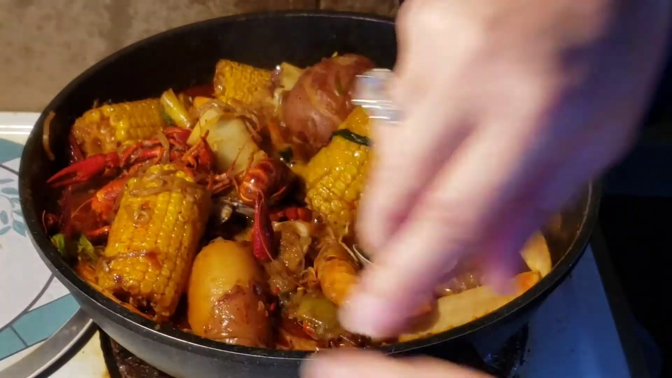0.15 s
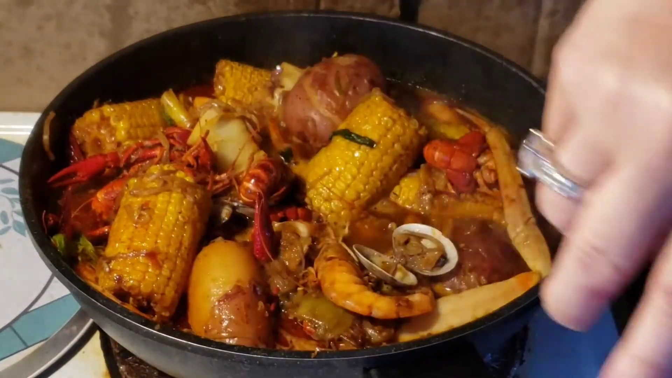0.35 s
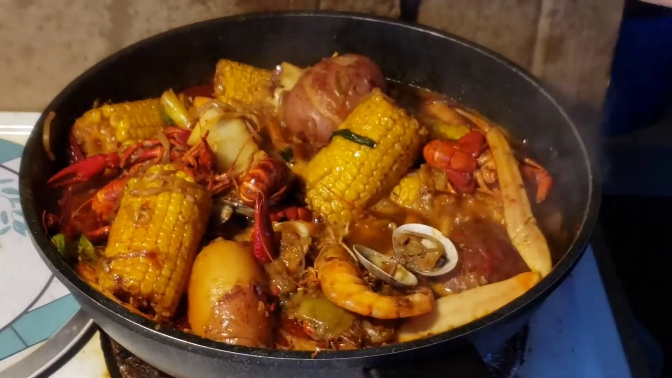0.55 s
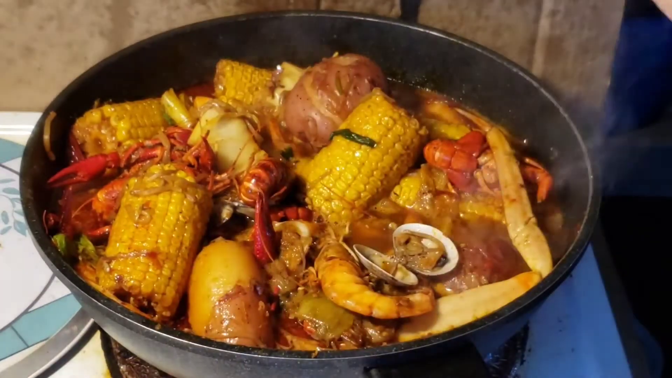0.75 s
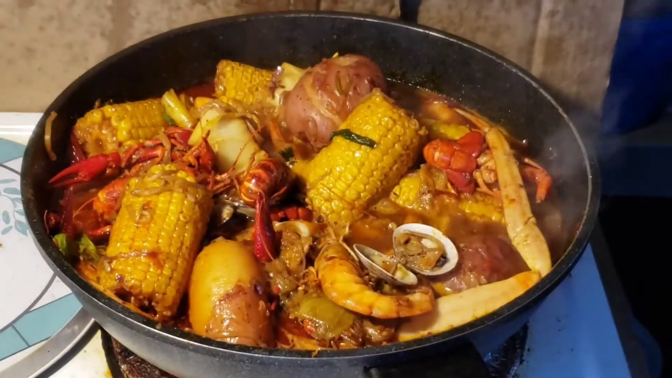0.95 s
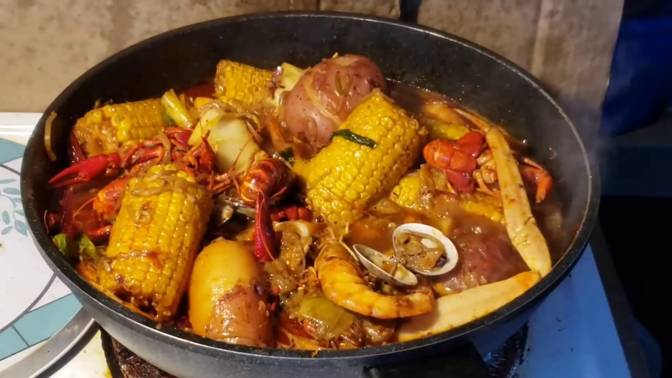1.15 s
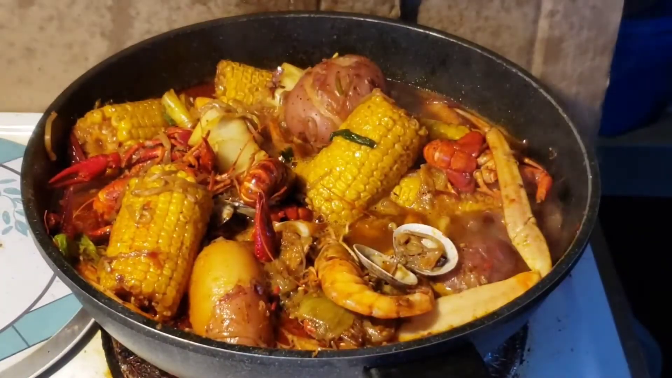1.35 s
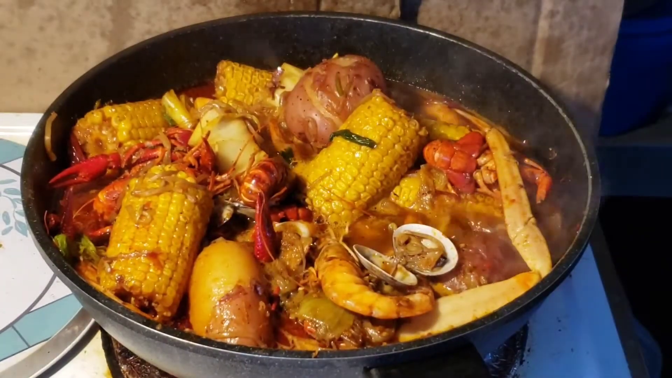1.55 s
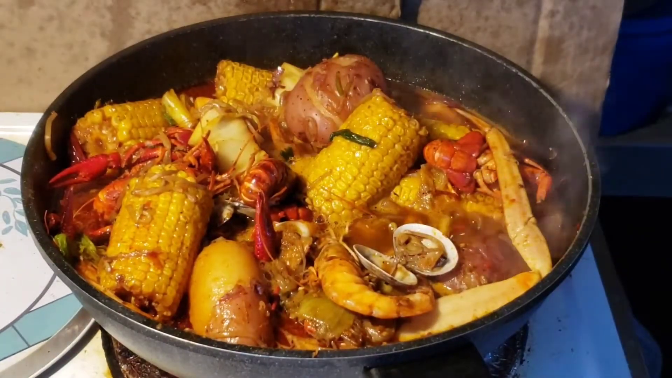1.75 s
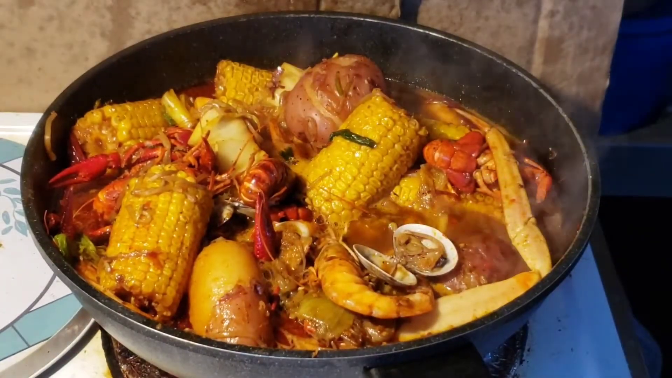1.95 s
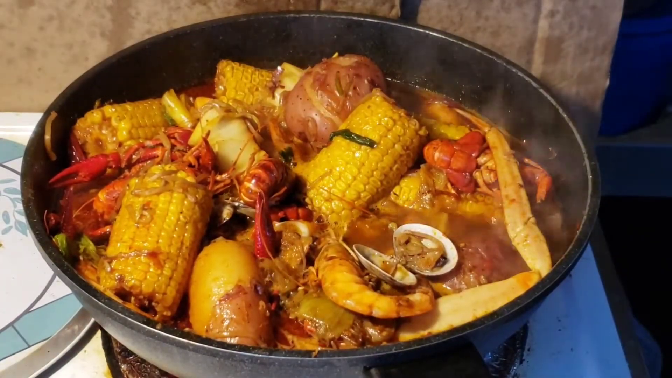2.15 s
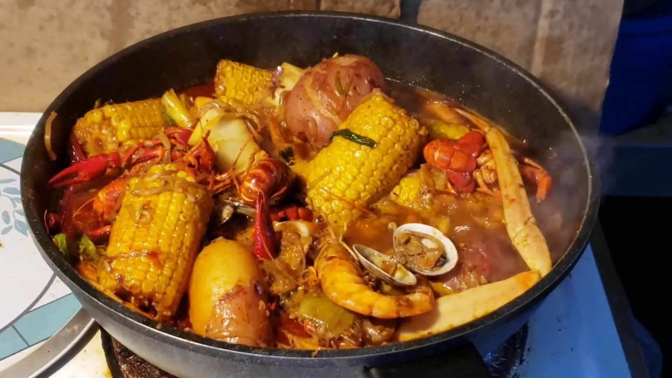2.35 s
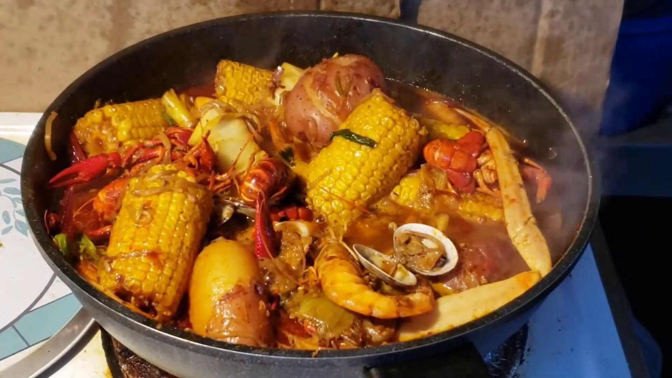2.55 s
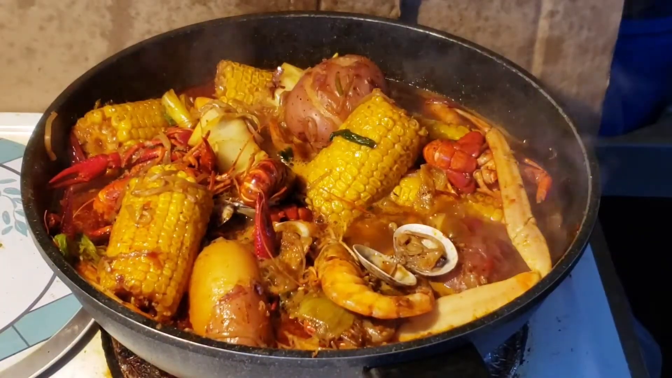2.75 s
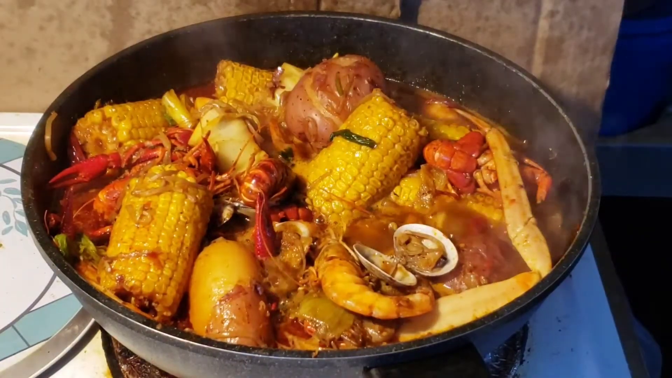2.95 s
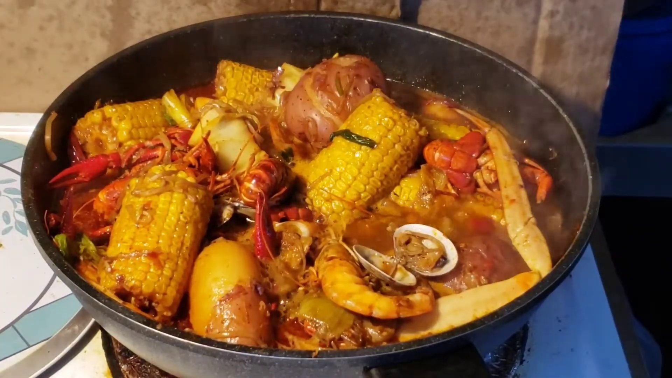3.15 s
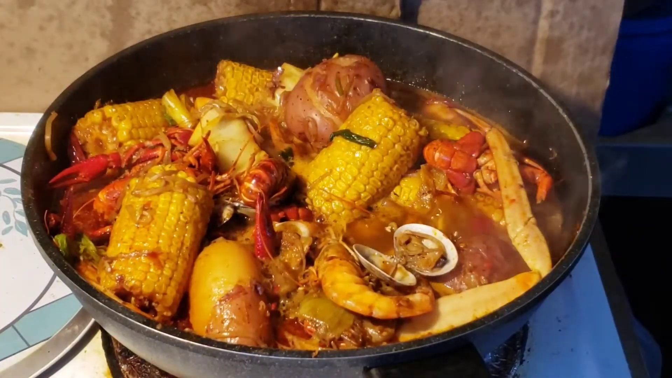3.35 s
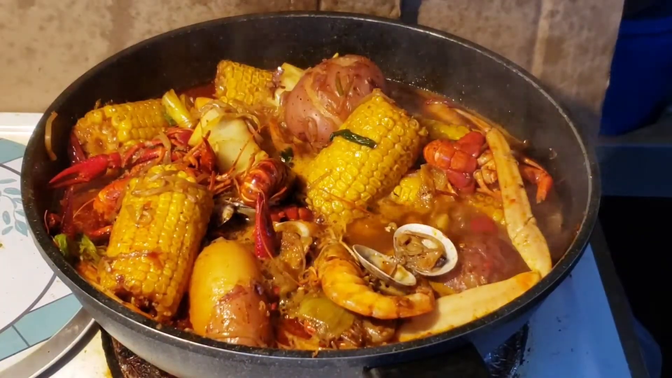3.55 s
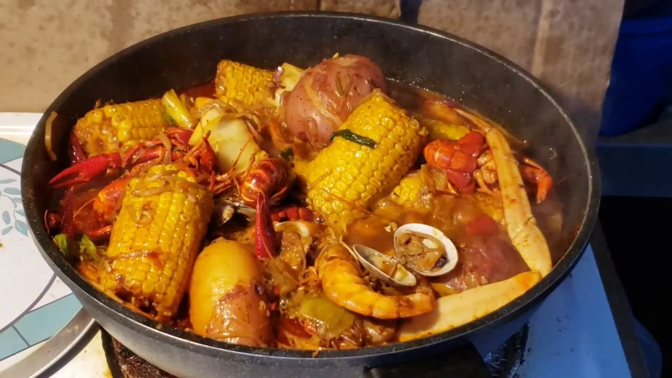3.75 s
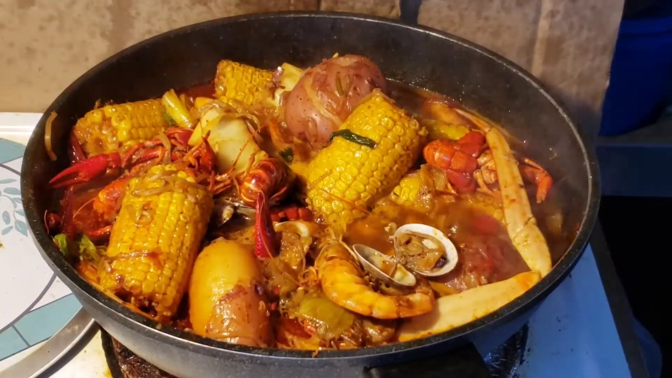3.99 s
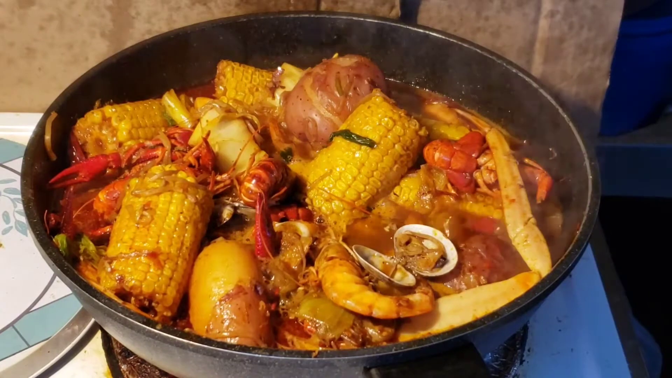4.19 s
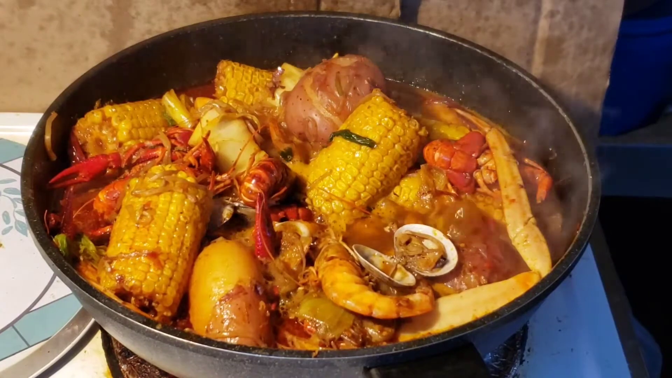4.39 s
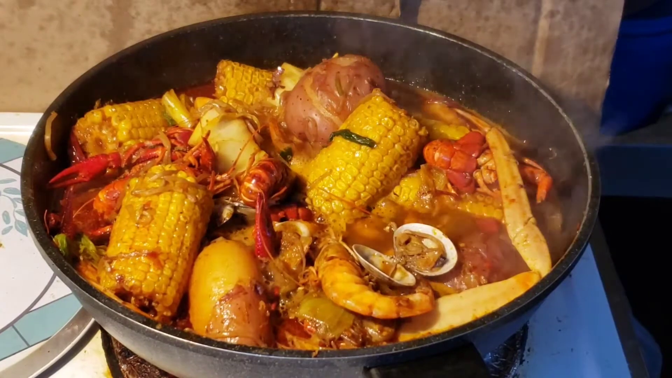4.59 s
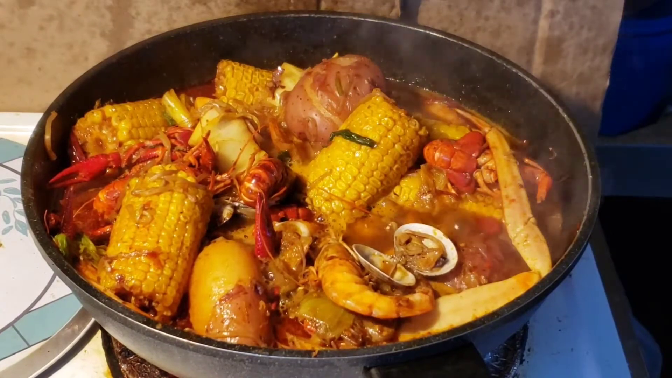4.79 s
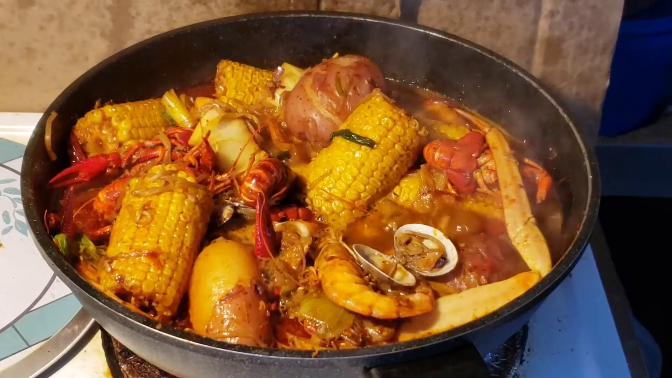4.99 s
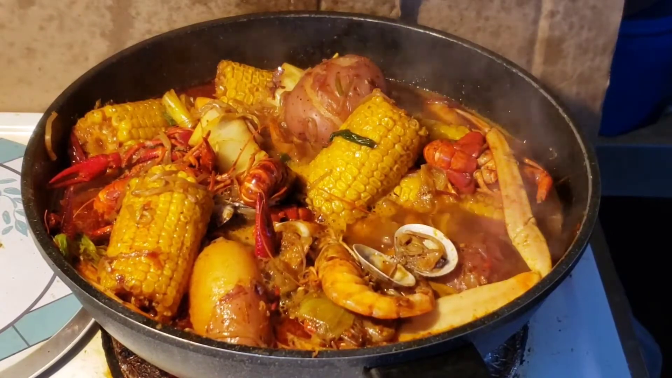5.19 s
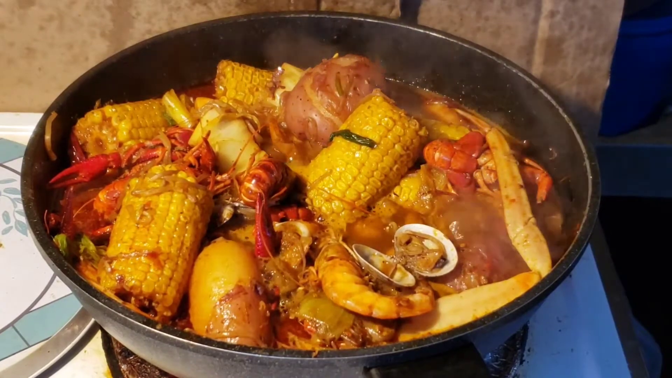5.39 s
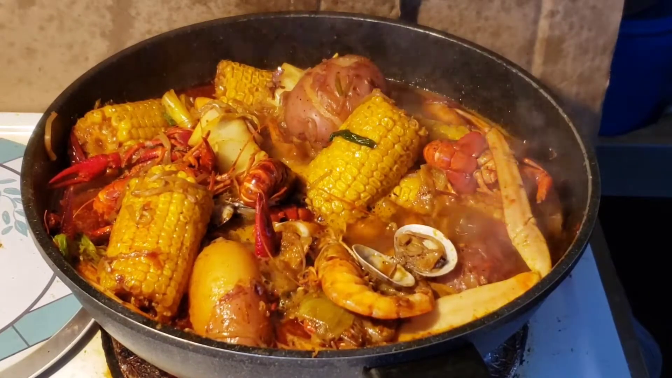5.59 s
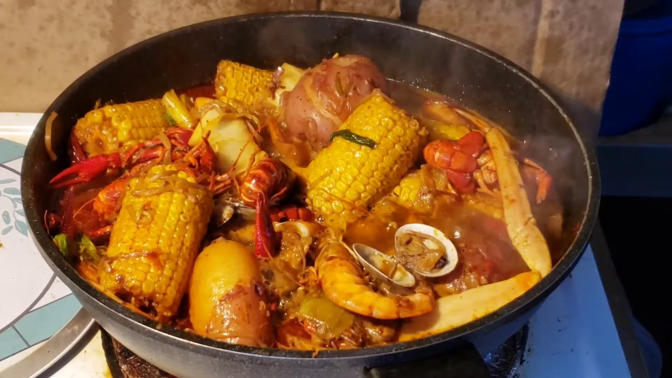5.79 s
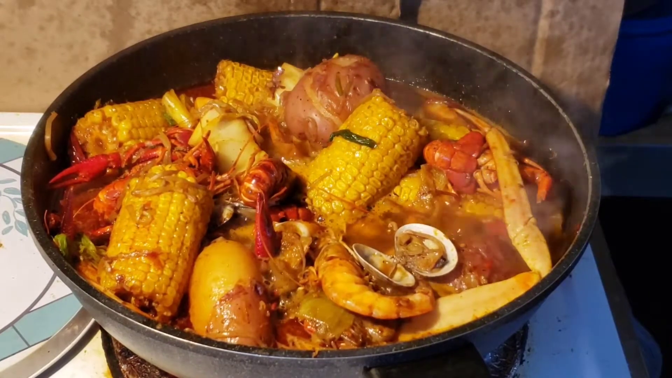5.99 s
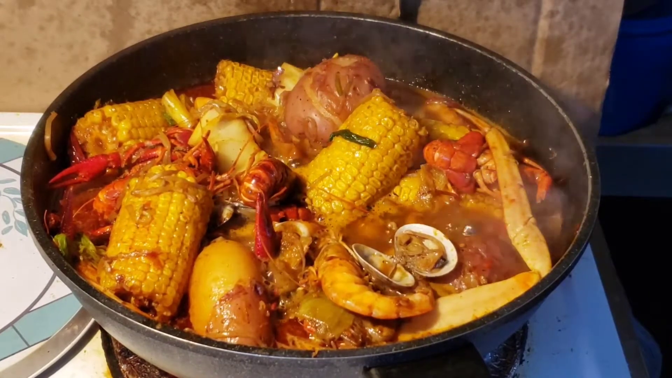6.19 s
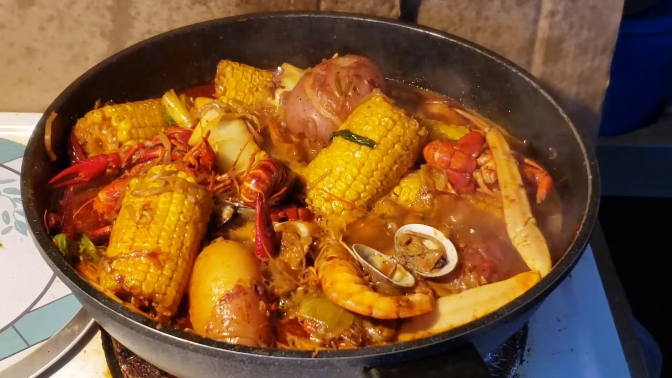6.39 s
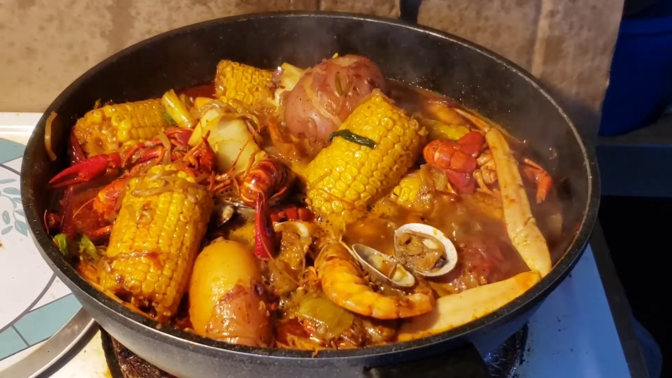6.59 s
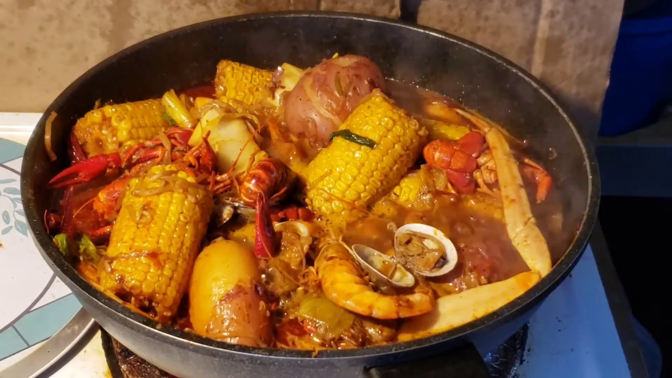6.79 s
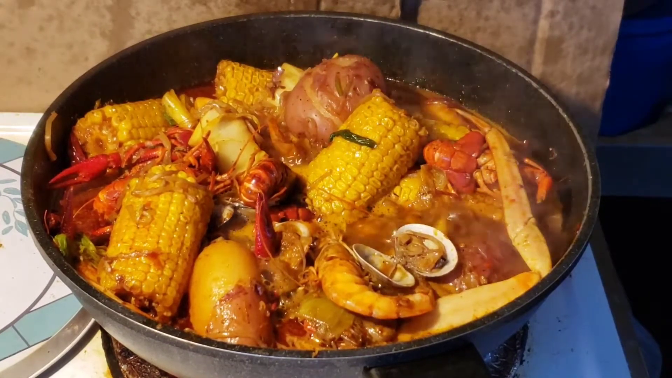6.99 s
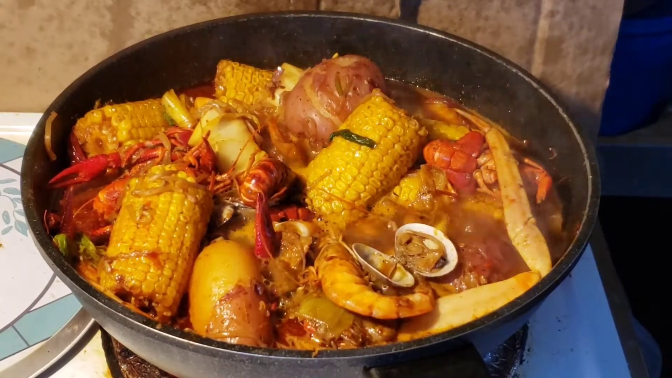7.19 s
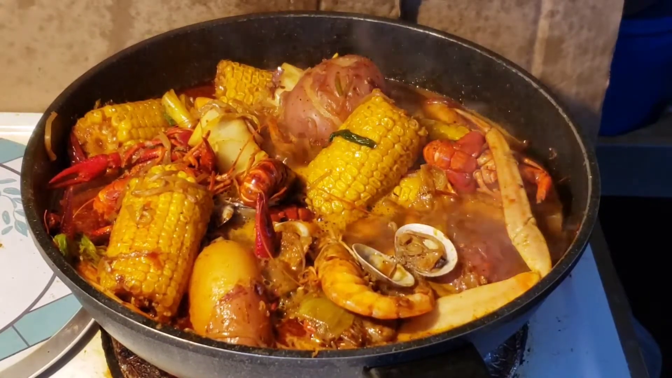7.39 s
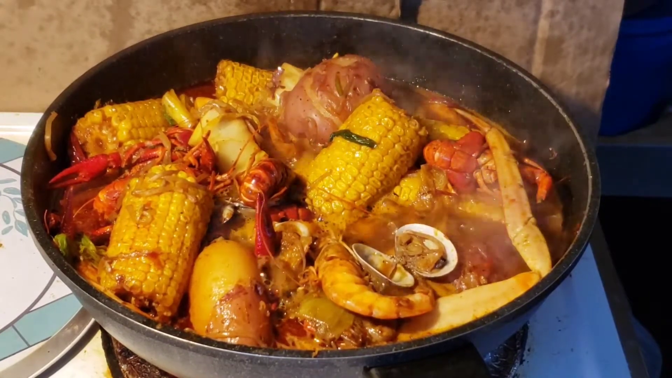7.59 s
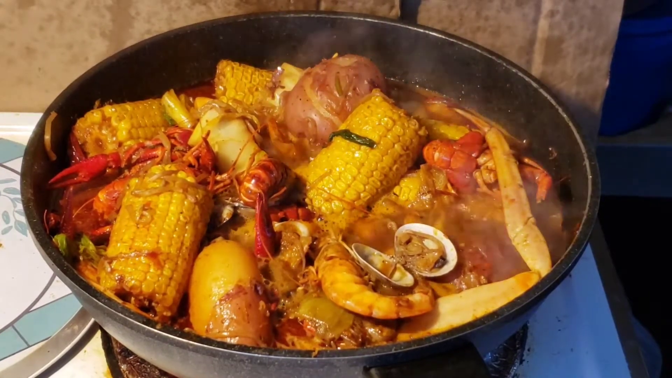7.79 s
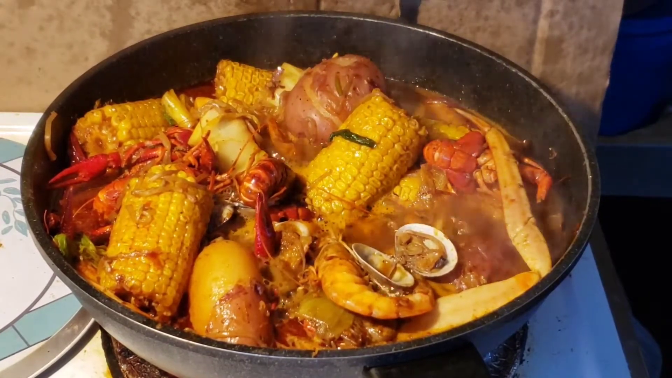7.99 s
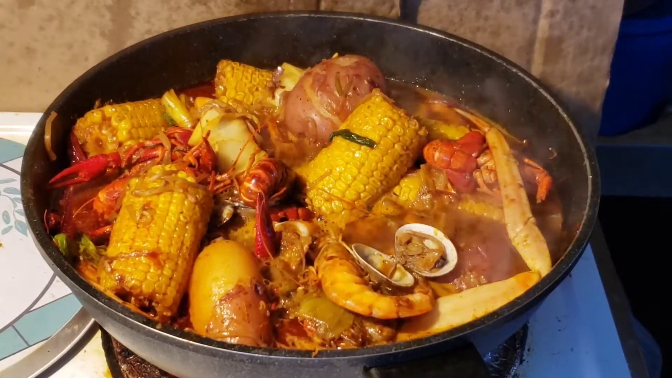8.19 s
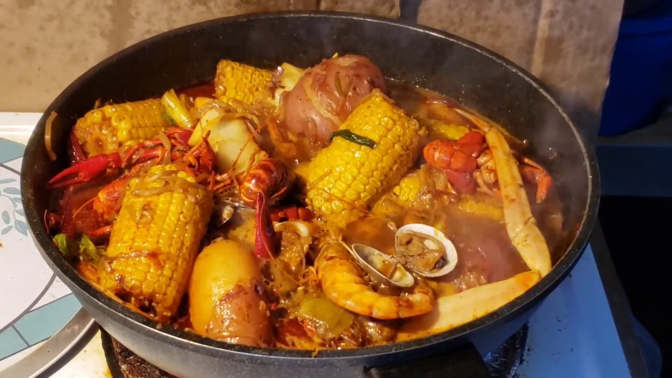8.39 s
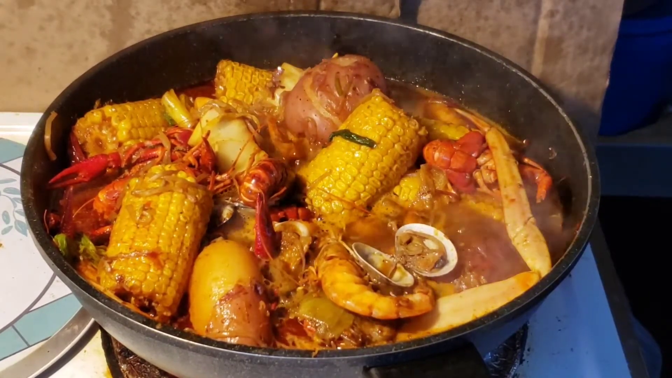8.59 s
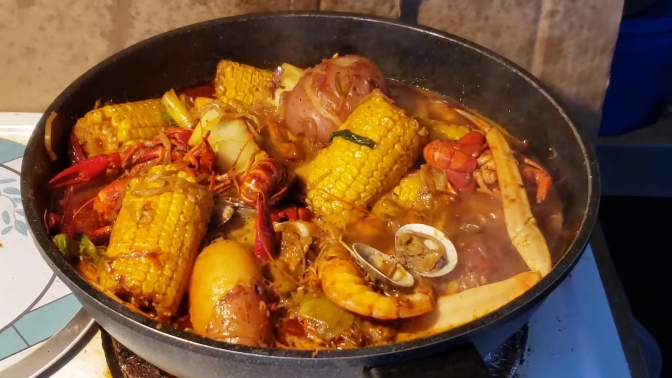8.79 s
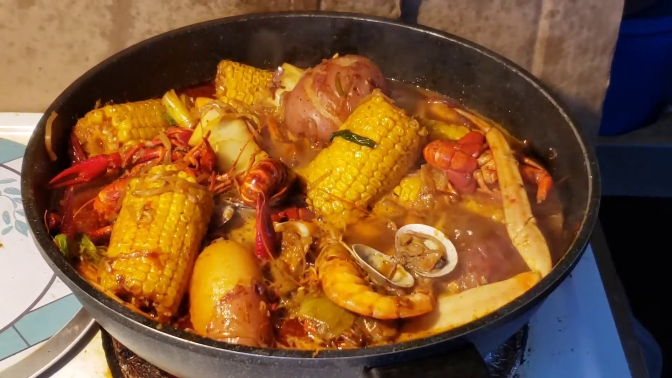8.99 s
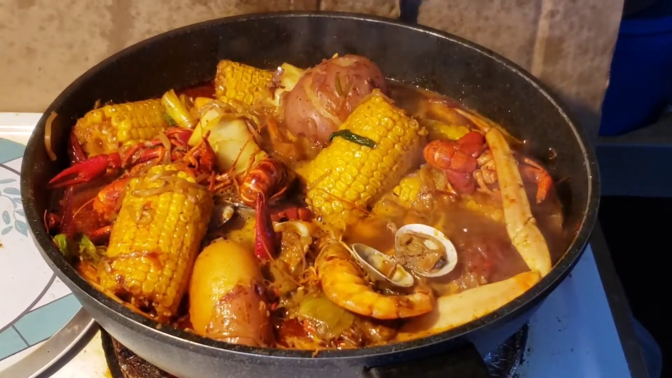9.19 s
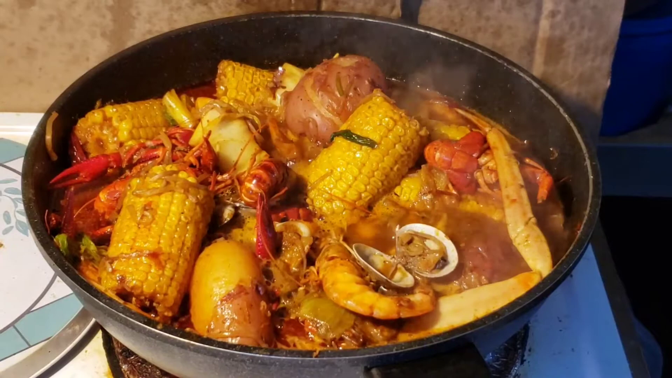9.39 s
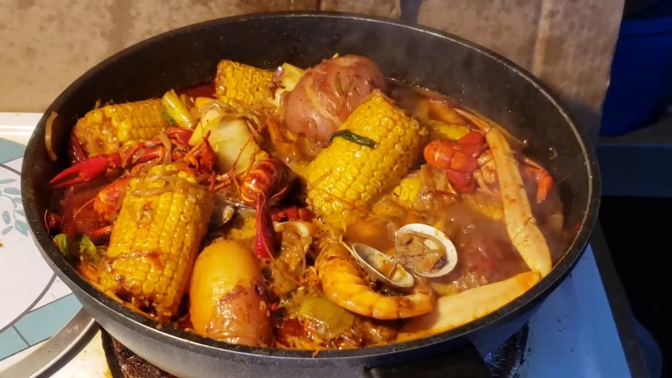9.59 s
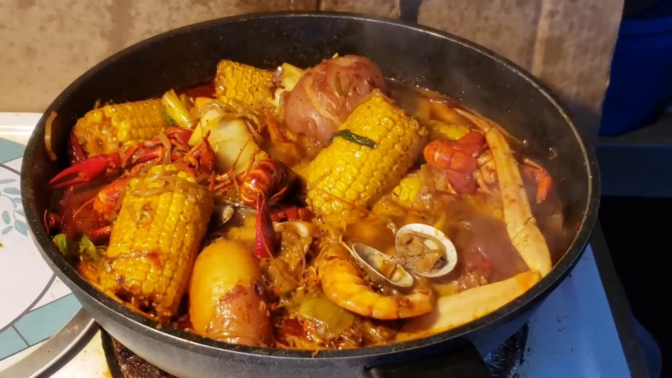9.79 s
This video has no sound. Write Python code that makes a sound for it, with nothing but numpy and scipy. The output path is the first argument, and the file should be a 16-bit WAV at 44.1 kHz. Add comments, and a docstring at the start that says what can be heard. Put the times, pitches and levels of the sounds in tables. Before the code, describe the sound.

The sound opens close up with ragged scrapes, a rustle and hollow bumps as a hand lets go of a metal utensil, with one sharp, briefly ringing click in the first quarter second. A faint gritty clink and soft bump follow just after 1 second. Throughout, thick sauce simmers in a wide pan, with wet plops, small bubbling pops and fine ticking. It is gentle at first, picks up around 2.5 seconds, grows busier from 5 seconds and is liveliest near 8.5 seconds. Droplets spit and sizzle on the hot wall, with the sharpest cracks at about 5, 7 and 8.4 seconds. Faint puffs of steam hiss near 1.3, 3 and 8.7 seconds. Underneath, a low, slowly wavering motor hum and soft fan rush continue until the end, near 10 seconds. The small kitchen adds short echoes.

```python
"""First come ragged scrapes, hollow bumps and one sharp metallic click as a hand lets go of a utensil
close by; a gritty clink follows. Thick sauce simmers around seafood in a wide pan and slowly grows
livelier: each bursting bubble is a damped oscillator of rising pitch that excites the pan's resonances.
Droplets spit and sizzle on the hot wall as trains of impulses, and steam puffs as smooth noise.
Under it all two motors beat slowly and a fan rushes; the small kitchen adds short echoes."""
import sys
import numpy as np
from scipy import signal
from scipy.fft import rfft, irfft
from scipy.io import wavfile

SR = 44100
rng = np.random.default_rng(int(sys.argv[2]) if len(sys.argv) > 2 else 0)


def materialize(psi):
    """Save the field psi as 16-bit PCM at rate SR to the path in sys.argv[1].

    A 1-D psi becomes a single channel; in a 2-D psi each row is a channel.
    """
    bounded = np.clip(np.atleast_2d(psi).T, -1, 1)
    quanta = np.round(bounded * 32767).astype(np.int16)
    wavfile.write(sys.argv[1], SR, quanta)


N = 434385

# Motor tones. Each entry: frequency in Hz in the first list, level in dB in the second.
MOTOR_HZ = [58.87, 59.14, 112.8, 120.03, 125.9, 225.5, 251.86]
MOTOR_DB = [-57, -55, -65.5, -54, -76, -78, -61.5]
# Loudness of the background hum: ducked for two seconds after the loud click, then recovering and
# wavering slightly. Each row: time in seconds, gain in dB.
HUM_LOUDNESS = [(0, -4.5), (.6, -7.5), (1.2, -7), (2.3, -5), (2.75, -.5), (3.4, -2), (5, -1.5), (7, -1.8),
                (8.5, 0), (9.85, -2.2)]
# Spectra of the noisy sources. Each row: frequency in Hz, gain in dB.
FAN_COLOUR = [(20, -39), (45, 5), (75, -0.5), (100, 0), (150, 2), (190, 3.5), (225, -0.5), (280, -1.5),
              (360, 4), (440, -12), (540, -5), (1000, -13), (2500, -40), (15000, -47)]
STEAM_COLOUR = [(880, -40), (1500, 2), (2120, -6), (2340, 3), (4640, -2), (7170, -0.5), (9370, -5),
                (14500, 1.5), (16000, -5.5)]
SIZZLE_COLOUR = [(600, -40), (1500, 2), (2500, 4.5), (4500, 3), (6000, 3.5), (7300, 5), (8400, -7),
                 (10500, -4), (13000, -1), (14800, -2.5), (16000, -3)]
RUSTLE_COLOUR = [(59, -43), (100, -6), (181, -7), (471, -5.5), (547, -3), (691, -15), (1080, -5.5),
                 (1520, -11.5), (3620, -8), (6000, -10.5), (16000, -18)]
CLICK_COLOUR = [(500, -20), (1500, -12), (3000, -7.5), (6300, 0.5), (8300, -7), (11000, 4), (14000, -1),
                (16000, -4)]
# Acoustic shadow on the right side. Each row: frequency in Hz, gain in dB.
RIGHT_SHADOW = [(200, -11.5), (800, -1), (1200, -7.5), (2500, -12), (4500, -13), (7000, -26), (8700, -10),
                (12000, -9.5), (15000, -14)]
# Puffs of steam. Each row: centre in seconds, level in dB, half-length in seconds.
STEAM_PUFFS = [(1.29, -54.5, 0.097), (3.055, -52, 0.18), (8.688, -53.5, 0.084)]
# Touches of an object set down. Each row: centre in seconds, level in dB, half-length in seconds.
CLINK_TOUCHES = [(1.149, 6, 0.0025), (1.156, -1.5, 0.0039), (1.164, 4, 0.0035), (1.185, -9, 0.021)]
# That object's modes. Each row: frequency in Hz, level in dB, 60 dB decay time in seconds.
CLINK_MODES = [(2060, -60, 0.011), (2400, -56, 0.022), (2680, -59, 0.008), (3740, -61, 0.0074),
               (4000, -52, 0.0085), (4200, -59, 0.008)]
# Scrapes of the utensil. Each row: centre in seconds, level in dB, half-length in seconds.
SCRAPES = [(.004, -23.5, 0.0086), (0.053, -22.5, 0.0068), (.087, -22, 0.0092), (0.11, -18, 0.0048),
           (.131, -24, 0.0092), (.228, -29, 0.01), (0.27, -38, 0.021)]
# Hollow bumps. Each row: start in seconds, peak in dB, pitch in Hz, length in seconds.
BUMPS = [(.010, -37, 288, 0.027), (0.028, -29, 264, 0.05105), (0.072, -40, 565, 0.032),
         (.088, -41, 185.3, 0.045), (.12, -46, 156.6, 0.036), (1.063, -51.5, 91, 0.11),
         (1.139, -45.5, 322.2, 0.014)]
# Modes of the utensil's thin metal. Each row: frequency in Hz, relative level in dB.
UTENSIL_MODES = [(2390, -26), (2928, -24), (4475, -21.5), (4955, -28), (5767, -26), (6119, -28),
                 (6599, -24), (6905, -24), (9611, -32), (11536, -27), (13352, -24), (14373, -22),
                 (15532, -24)]
# Vigour of the boil. Each row: time in seconds, level in dB against a full simmer.
VIGOUR = [(0.4, -5), (1.5, -5.5), (2.25, -5), (2.6, -1), (3.45, -2), (4.1, -2), (5.2, 1.5), (6.2, 1),
          (7.5, 1.5), (8.6, 4.5), (9.85, 1.5)]
# Flares of frying as sauce washes up the hot wall. Each row: time of the peak in seconds, level in dB.
FLARES = [(1.93, -56.5), (2.18, -56), (2.57, -55), (3.65, -55.5), (3.99, -61), (4.36, -71), (5.15, -63),
          (5.39, -49.5), (5.9, -51.5), (6.41, -51), (6.68, -56), (7.78, -56), (8.029, -51), (8.2, -54),
          (8.5, -52), (8.68, -51), (9.32, -51), (9.56, -51)]
# Brief dips in frying and hiss. Each row: centre in seconds, gain in dB, half-length in seconds.
LULLS = [(2.09, -8, 0.055), (3.393, -7, 0.1225), (9.462, -6, 0.037)]
# Loudest droplets. Each row: time in seconds, level in dB, extra gain of the top octave in dB.
SPITS = [(0.539, -29.5, -6), (2.574, -26.5, -13), (3.9487, -37, 11), (4.163, -22.5, -19),
         (4.6685, -29, -15), (4.7314, -27.5, -22), (4.9333, -27.5, 4.5), (5.0379, -26, -6),
         (5.1125, -27.5, -8), (5.1340, -16.5, 8), (5.1382, -36, 4), (5.143, -34, 4), (5.2183, -40, -5),
         (5.221, -22.5, 5), (5.464, -42, 15), (5.65, -22.5, 2), (5.702, -33, 9), (6.497, -32, 3),
         (6.6953, -28, -15), (6.925, -30.5, -14), (7.1351, -21, -9), (7.1498, -17, 3), (7.3, -24, -10),
         (7.3685, -29.5, -17), (7.4814, -20.5, -2.5), (7.562, -34.5, 5), (7.612, -30.5, 2),
         (8.0754, -37, 13), (8.362, -17.5, -14), (8.7035, -28, 5), (9.0315, -34, 5), (9.2943, -21, -4),
         (9.397, -24, -22), (9.5138, -36, 11), (9.6405, -22.5, 2)]
# Closest pinhead bubbles. Each row: start in seconds, level in dB, pitch in Hz.
SNAPS = [(2.823, -30, 10000), (3.484, -36, 5050), (3.821, -37, 6500), (3.998, -30, 8000),
         (4.132, -36, 7000), (4.158, -32, 5500), (4.47, -31, 5500), (4.668, -19, 6500), (4.965, -33, 7000),
         (5.57, -32, 6500), (5.832, -25, 9000), (6.685, -31, 7000), (6.974, -29, 10000), (7.78, -30, 7000),
         (8.145, -32, 7000), (8.472, -21, 11000), (9.033, -21, 4330), (9.163, -28, 7000),
         (9.258, -29, 7000), (9.552, -29, 5500)]
# Resonances of the pan and its tiled nook. Each row: frequency in Hz, bandwidth in Hz, gain in dB.
PAN_MODES = [(525.6, 32, 7), (611.4, 25, 7), (830, 36, 9.5), (1080, 74, 9), (1358, 78, 1), (1876, 520, -1)]
# Largest bubbles. Each row: start in seconds, level in dB, pitch in Hz.
PLOPS = [(0.606, -47, 1330), (0.766, -41.5, 1128), (0.808, -45, 1380), (1.061, -44, 1120),
         (1.278, -42, 1080), (1.384, -43, 1010), (1.982, -38.5, 1280), (2.166, -39, 1700),
         (2.201, -41.5, 804.7), (2.478, -38.5, 2800), (2.502, -42, 1100), (2.575, -39, 1284),
         (2.599, -34, 1210), (2.644, -43, 1043), (3.124, -37.5, 1390), (3.212, -32, 880), (3.61, -35, 1280),
         (3.82, -37.5, 1100), (3.857, -42, 684), (3.921, -37, 2450), (3.981, -32, 1220), (3.998, -36, 2650),
         (4.235, -44.5, 1480), (4.3, -40.5, 2150), (4.349, -33, 3880), (4.454, -35, 1190),
         (4.47, -31, 2580), (4.501, -34, 1270), (4.523, -37, 1090), (4.608, -43, 993), (4.744, -37, 1070),
         (4.965, -34.5, 2400), (5.009, -38, 674), (5.038, -36, 2000), (5.078, -36, 1200),
         (5.151, -31.5, 1230), (5.298, -41.5, 1038), (5.323, -36, 1600), (5.428, -33.5, 1300),
         (5.56, -35, 1420), (5.612, -36, 1020), (5.64, -37, 890), (5.657, -37.5, 1013), (5.732, -35, 1090),
         (5.876, -34, 910), (5.878, -35, 2740), (5.952, -36, 1120), (5.986, -33, 2270), (6.065, -37, 1700),
         (6.1, -42, 1030), (6.33, -32.5, 1380), (6.425, -43.5, 2200), (6.467, -38.5, 1046),
         (6.569, -38, 630), (6.645, -43, 1106), (6.745, -41, 947), (6.79, -33.5, 1130),
         (6.845, -36.5, 1600), (6.892, -41, 910), (6.8995, -31.5, 1140), (7.0092, -34, 1300),
         (7.076, -39.5, 934), (7.118, -39, 910), (7.161, -38, 895), (7.2692, -33.5, 1330),
         (7.368, -39.5, 1390), (7.391, -39.5, 799), (7.426, -41, 1960), (7.437, -39, 890),
         (7.464, -37.5, 1064), (7.486, -34.5, 1020), (7.548, -45, 1024), (7.795, -36, 1060),
         (7.867, -38, 830), (7.979, -36, 1100), (8.007, -32.5, 1250), (8.077, -45, 960), (8.242, -34, 1460),
         (8.299, -33.5, 830), (8.461, -29, 1330), (8.511, -33.5, 980), (8.569, -41, 950),
         (8.667, -35.5, 1048), (8.704, -44, 1050), (8.734, -36.5, 1030), (8.812, -31.5, 1000),
         (8.882, -34, 873.8), (8.903, -40, 1970), (8.975, -35, 720), (9.004, -33, 1250),
         (9.032, -22.5, 2670), (9.098, -43, 1083), (9.131, -48, 1031), (9.207, -34, 1360),
         (9.234, -31, 1400), (9.258, -38, 2540), (9.275, -35, 806), (9.342, -35.5, 1640),
         (9.383, -37.5, 1390), (9.474, -40, 1470), (9.499, -34.5, 1200), (9.524, -32.5, 2170),
         (9.538, -37, 940), (9.6, -34, 1150), (9.689, -41, 1050), (9.833, -34.5, 1080)]

PLACES = 6  # spots in the pan where things burst
KITCHEN_T60_S, NOOK_T60_S = 0.16, 0.057


def from_db(db):
    """Amplitude grows tenfold for every 20 dB."""
    return 10 ** (np.asarray(db) / 20)


def rms_one(x):
    """Normalisation to an rms of 1."""
    return x / np.sqrt(np.mean(x ** 2) + 1e-20)


def level(rows):
    """A gain envelope, interpolated in dB between rows of time and level."""
    return from_db(np.interp(np.arange(N) / SR, *np.transpose(rows)))


def add(track, s, sound):
    """Superposition: a sound joins the track at s seconds."""
    at = int(np.clip(s * SR, 0, N - 1))
    track[at:at + len(sound)] += sound[:N - at]


def hump(s, rise_s, fall_s):
    """A Gaussian envelope of height 1 at s seconds, with its own width on each side."""
    t = np.arange(0, N, 50) / SR - s
    widths = np.clip(t / np.where(t < 0, rise_s, fall_s), -5, 5)
    return np.interp(np.arange(N) / SR - s, t, np.exp(-widths ** 2))


def humps(rows):
    """A sum of Gaussian envelopes from rows of centre, level and half-length."""
    return sum(from_db(db) * hump(s, half_s, half_s) for s, db, half_s in rows)


def dying(t60):
    """Exponential decay through 60 dB: time axis and envelope."""
    t = np.arange(int(t60 * SR) + 2) / SR
    return t, from_db(-60 * t / t60)


def drift(hz):
    """Low-passed noise wanders smoothly, with an rms of 1."""
    r = np.exp(-200 * np.pi * hz / SR)
    slow = signal.lfilter([1], [1, -2 * r, r * r], rng.standard_normal(N // 100 + 1002))[1000:]
    return np.interp(np.arange(N) / 100, np.arange(len(slow)), rms_one(slow))


def cut(x, kind, hz, order=1):
    """A Butterworth filter passes the "low" or "high" side of a frequency."""
    return signal.sosfilt(signal.butter(order, hz, kind, fs=SR, output="sos"), x)


def colour(x, spectrum, size=4096):
    """A minimum-phase filter imposes a spectrum causally, by folding its cepstrum."""
    hz, db = np.transpose(spectrum)
    grid = np.maximum(np.fft.rfftfreq(size, 1 / SR), 1)
    cepstrum = irfft(np.log(from_db(np.interp(np.log(grid), np.log(hz), db))))
    cepstrum[1:size // 2] *= 2
    cepstrum[size // 2 + 1:] = 0
    response = irfft(np.exp(rfft(cepstrum)))
    return signal.oaconvolve(np.atleast_2d(x), response[None], axes=1)[:, :N]


def stereo_noise(correlation):
    """Mid and side noise combine into two partly coherent channels."""
    mid, side = rng.standard_normal((2, N))
    return np.sqrt(1 + correlation) * mid + np.sqrt(1 - correlation) * side * [[1], [-1]]


def crackle(per_s, size_db, clump_db):
    """Shot noise: impulses of very unequal size, louder in clumps, with an rms of 1."""
    born = rng.random(N) < per_s / SR
    sizes = from_db(size_db * np.minimum(rng.exponential(1, N), 5) + clump_db * drift(hz=43))
    return rms_one(born * sizes * rng.choice([-1, 1], N))


def scattered(x):
    """A distributed source: each sample goes to a random place."""
    return x * (rng.integers(0, PLACES, N) == np.arange(PLACES)[:, None])


def lesser_bursts(db, spread_db, count):
    """Random pairs of time and level: the rate rises with time, the level follows the boil."""
    when, size = rng.random((count, 2)).T
    s = when ** 0.7 * N / SR
    return zip(s, db + np.interp(s, *np.transpose(VIGOUR)) + spread_db * (2 * size - 1))


def kitchen(x, nook_db, room_db, lag_samples=2):
    """Reflections from nook and room follow the direct sound, which is late and shaded on the right."""
    t = np.arange(SR // 4) / SR
    echoes = np.zeros((2, len(t)))
    for t60, db in ((NOOK_T60_S, nook_db), (KITCHEN_T60_S, room_db)):
        shared, own = rng.standard_normal((2, len(t))) * np.exp(-np.log(1000) * t / t60) * (t > .001)
        lows = cut(shared - own, "low", 650)  # long waves reach both sides alike
        echoes += from_db(db) * np.array([shared, own + lows]) / np.sqrt(np.sum(shared ** 2))
    direct = np.zeros((2, len(t)))
    direct[0, 0] = direct[1, lag_samples] = 1
    echo_shadow = [(hz, 0.31 * db) for hz, db in RIGHT_SHADOW]
    left = direct[0] + echoes[0]
    right = colour(direct[1], RIGHT_SHADOW)[0] + colour(echoes[1], echo_shadow)[0]
    return signal.oaconvolve(np.atleast_2d(x), np.array([left, right[:len(t)]]), axes=1)[:, :N]


def around_pan(tracks, nook_db, room_db):
    """Path differences: lag and echoes vary from place to place."""
    return sum(kitchen(x, nook_db, room_db, lag_samples=k % 5) for k, x in enumerate(tracks))


def hum(in_phase_s=4.9):
    """Beating: two motors turn at nearly the same speed, over the low rush of a fan."""
    t = np.arange(N) / SR - in_phase_s
    tones = sum(np.sqrt(2) * from_db(db) * np.cos(2 * np.pi * hz * t)
                for hz, db in zip(MOTOR_HZ, MOTOR_DB))
    rush = from_db(-53.5) * rms_one(colour(stereo_noise(correlation=0.89), FAN_COLOUR))
    return (tones * from_db([[.7], [-.7]]) + rush) * level(HUM_LOUDNESS)


def steam(lulls):
    """Broadband noise: a faint hiss and its puffs add in power."""
    hiss = from_db(-64) * level(VIGOUR) ** 0.23 * lulls
    noise = rms_one(colour(stereo_noise(correlation=0.064), STEAM_COLOUR))
    return np.hypot(hiss, humps(STEAM_PUFFS)) * noise * from_db([[3], [-2]])


def clink(slips_per_s=2500):
    """Stick-slip friction: an object skids to rest, and each tiny slip excites the same modes."""
    slips = (rng.random(N) < slips_per_s / SR) * rng.choice([-1, 1], N) * humps(CLINK_TOUCHES)
    body = np.zeros(N)
    for hz, db, t60 in CLINK_MODES:
        t, fade = dying(t60)
        add(body, 0, from_db(db) * fade * np.sin(2 * np.pi * hz * t))
    return kitchen(signal.fftconvolve(slips, body)[:N], nook_db=-1.5, room_db=-5)


def bumps():
    """Low tone bursts only a few cycles long are heard as soft, hollow bumps."""
    out = np.zeros(N)
    for s, db, hz, length in BUMPS:
        t = np.arange(int(length * SR)) / SR
        envelope = np.sin(np.pi * (t / length) ** 0.56)
        add(out, s, from_db(db) * envelope * np.sin(2 * np.pi * hz * t))
    return out


def utensil_click(start_s=.1401, click_db=-13, ring_db=-10):
    """Impact and free vibration: a hard click leaves thin metal ringing in its modes."""
    click, ring = np.zeros((2, N))
    t, fade = dying(t60=0.038)
    envelope = fade + np.exp(-t / 0.0004)
    add(click, start_s, from_db(click_db) * envelope * rng.choice([-1, 1], len(t)))
    t, fade = dying(t60=.1)
    for hz, db in UTENSIL_MODES:
        add(ring, start_s, from_db(ring_db + db) * fade * np.sin(2 * np.pi * (hz * t + rng.random())))
    click = kitchen(colour(click, CLICK_COLOUR), nook_db=-2.5, room_db=-14)
    return ring * from_db([[2.5], [-5]]) + click * from_db([[5], [-2]])


def hand(hold_s=0.16, fade_db_per_s=105):
    """Friction noise: a hand scrapes a utensil about, and its rustle fades as it pulls away."""
    away_s = np.maximum(np.arange(N) / SR - hold_s, 0)
    rustle = scattered(crackle(per_s=9000, size_db=3.0, clump_db=1.3))
    rustle *= from_db(-28 - fade_db_per_s * away_s)
    scrapes = cut(scattered(rng.standard_normal(N)) * humps(SCRAPES), "high", 1400)
    friction = around_pan((rustle + scrapes)[:, :SR], nook_db=0.5, room_db=-14)
    friction = np.pad(friction, ((0, 0), (0, N - friction.shape[1])))
    return colour(friction, RUSTLE_COLOUR) * from_db([[.5], [2.5]])


def sizzle():
    """Shot noise of frying: a fine bed adds in power to flares where sauce meets the wall."""
    bed = from_db(-62.5) * level(VIGOUR) ** 0.55
    flares = sum(from_db(db) * hump(s, rise_s=0.05, fall_s=0.03) for s, db in FLARES)
    return np.hypot(bed, flares) * scattered(crackle(per_s=1500, size_db=2.5, clump_db=2.5))


def spits(spray_db, spray_t60, crack_db, crack_t60, fizz_s, fizz_db, split_hz=8500):
    """Noise transients: a droplet on the hot wall fizzes, cracks and sprays; small ones are brighter."""
    out = np.zeros((PLACES, N))
    t, fade = dying(spray_t60)
    fizz = from_db(fizz_db) * np.linspace(0, 1, int(fizz_s * SR)) ** 2
    crack = from_db(crack_db) * np.exp(-np.log(1000) * t / crack_t60)
    lesser = [(s, db, rng.uniform(-5, 7.6)) for s, db in lesser_bursts(db=-41, spread_db=3.0, count=26)]
    for k, (s, db, bright_db) in enumerate(SPITS + lesser):
        spray = from_db(spray_db) * fade * (rng.random(len(t)) < .1)
        envelope = np.concatenate([fizz, spray + crack])
        burst = envelope * rng.choice([-1, 1], len(envelope))
        lows = cut(burst, "low", split_hz, order=4)
        highs = cut(burst, "high", split_hz, order=4)
        add(out[k % PLACES], s - fizz_s, from_db(db) * (lows + from_db(bright_db) * highs))
    return out


def bubble(hz, cycles, rise, opening_cycles=.35):
    """A damped oscillator: it swells as the bubble opens, then dies away while its pitch climbs."""
    t, fade = dying(cycles / hz)
    opening = 1 - np.exp(-t * hz / opening_cycles)
    return fade * opening * np.sin(2 * np.pi * hz * t * (1 + rise * t / t[-1]))


def swarm(centre_hz, octaves, cycles, size_db, count, rise, limit):
    """Bubbles at random times, log-normal in pitch and amplitude up to `limit` standard deviations."""
    out = np.zeros((PLACES, N))
    starts = rng.random(count) * N / SR
    deviations = np.clip(rng.standard_normal((count, 2)), -limit, limit)
    for k, (s, (pitch, size)) in enumerate(zip(starts, deviations)):
        hz = min(centre_hz * 2 ** (octaves * pitch), SR / 3)
        add(out[k % PLACES], s, from_db(size_db * size) * bubble(hz, cycles, rise))
    return out


def ticks():
    """Small cavities resonate high: pinhead bubbles tick one by one, louder as the boil livens."""
    bubbles = swarm(centre_hz=8360, octaves=0.64, cycles=4.6, size_db=6.0, count=520,
                    rise=0.15, limit=1.7)
    return rms_one(bubbles) / np.sqrt(PLACES) * level(VIGOUR) ** 0.63


def snaps():
    """Rapid damping makes each of the closest pinhead bubbles a single tick."""
    out = np.zeros((PLACES, N))
    for k, (s, db, hz) in enumerate(SNAPS):
        add(out[k % PLACES], s, from_db(db) * bubble(hz, cycles=7.0, rise=0.13))
    return out


def pan(x, coupling_db):
    """Sympathetic resonance: the pan's modes ring with whatever bursts in it."""
    x = x + 1e-18
    out = x.copy()
    for hz, width, db in PAN_MODES:
        r = np.exp(-np.pi * width / SR)
        feedforward = np.array([1, 0, -1]) * (1 - r * r) / 2
        feedback = [1, -2 * r * np.cos(2 * np.pi * hz / SR), r * r]
        out += from_db(db + coupling_db) * signal.lfilter(feedforward, feedback, x)
    return out


def simmer(centre_hz, octaves, cycles, size_db, count):
    """Random excitation: many small bubbles drive the pan, at a level that follows the boil."""
    bubbles = swarm(centre_hz, octaves, cycles, size_db, count, rise=0.074, limit=2)
    return rms_one(pan(bubbles, coupling_db=3.5)) / np.sqrt(PLACES) * level(VIGOUR)


def plops(cycles, gap_s, octaves, after_db, gulp_db, gulp_hz, lesser_hz, followers=4):
    """Cavity resonance: a large bubble chirps upward over a low gulp and sets off a few weaker ones."""
    out = np.zeros((PLACES, N))
    lesser = [(s, db, lesser_hz * 2 ** rng.uniform(-0.9093, 1.0))
              for s, db in lesser_bursts(db=-42, spread_db=1.5, count=16)]
    for k, (s, db, hz) in enumerate(PLOPS + lesser):
        place = out[k % PLACES]
        chirp = bubble(hz, cycles * hz / 1000, rise=0.059)  # the same decay time at every pitch
        gulp = bubble(gulp_hz * 2 ** rng.uniform(-0.3, 0.47), cycles, rise=0.1013)
        add(place, s, from_db(db) * chirp)
        add(place, s, from_db(db + gulp_db) * gulp)
        waits = np.cumsum(rng.exponential(gap_s, followers))
        for wait, pitch in zip(waits, rng.uniform(-0.24, 1, followers)):
            follower = bubble(hz * 2 ** (octaves * pitch), cycles, rise=0.7)
            add(place, s + wait, from_db(db + after_db) * follower)
    return pan(cut(out, "high", 500), coupling_db=1.5)


def scene():
    """Superposition of boiling, frying, steam and handling noises over the kitchen's hum."""
    small = from_db(-58.0) * simmer(centre_hz=1600, octaves=0.57, cycles=11.0, size_db=2.0, count=2000)
    low = from_db(-61.5) * simmer(centre_hz=528, octaves=0.7, cycles=4.6, size_db=4.0, count=700)
    large = from_db(5.0) * plops(cycles=5.03, gap_s=.006, octaves=0.77, after_db=-7.5,
                                 gulp_db=-19.5, gulp_hz=560, lesser_hz=1780)
    boiling = around_pan(small + low, nook_db=-2.5, room_db=-3.5)
    boiling += around_pan(large, nook_db=-2.5, room_db=-4.5)
    lulls = from_db(sum(db * hump(s, half_s, half_s) for s, db, half_s in LULLS))
    droplets = spits(spray_db=-23, spray_t60=0.2, crack_db=-6.5, crack_t60=.0056, fizz_s=.008, fizz_db=-29)
    pinheads = from_db(-64) * lulls * ticks() + from_db(2.5) * snaps()
    frying = around_pan(lulls * sizzle(), nook_db=-2.5, room_db=-4.5)
    frying += around_pan(droplets + pinheads, nook_db=-5.0, room_db=-4.0)
    cooking = boiling + colour(frying, SIZZLE_COLOUR) + steam(lulls)
    return cooking + bumps() + utensil_click() + hand() + clink() + hum()


def record(dry, ceiling=.85, cutoff_hz=16000):
    """Soft saturation rounds the peaks, and a steep low-pass filter cuts the top."""
    low_pass = signal.ellip(10, .2, 70, cutoff_hz, fs=SR, output="sos")
    return signal.sosfilt(low_pass, ceiling * np.tanh(dry / ceiling))


dry = scene()
out = record(dry)
materialize(out)
```